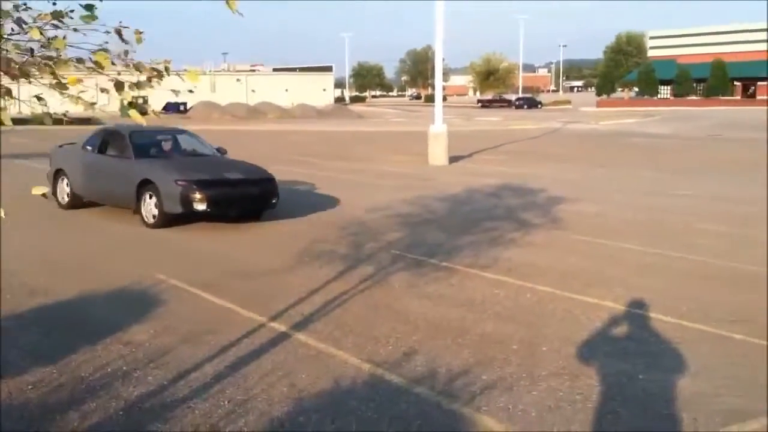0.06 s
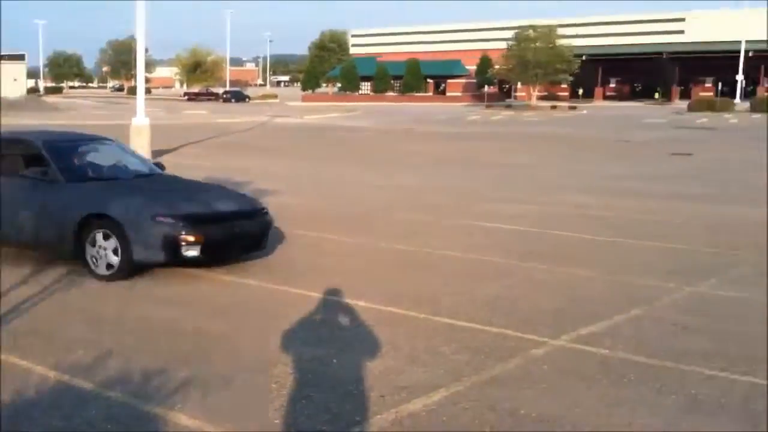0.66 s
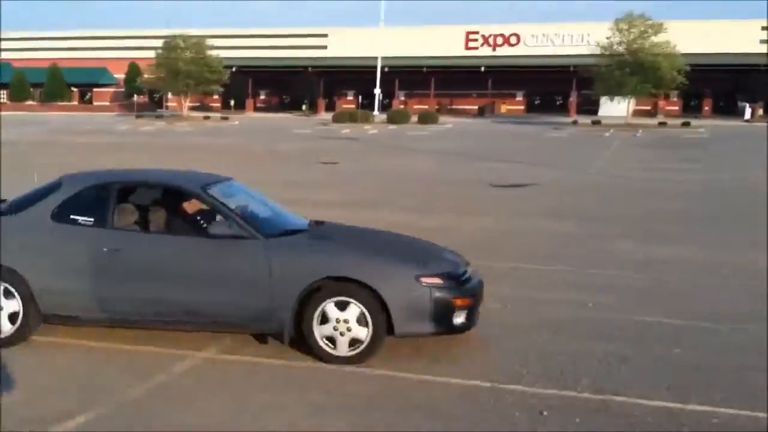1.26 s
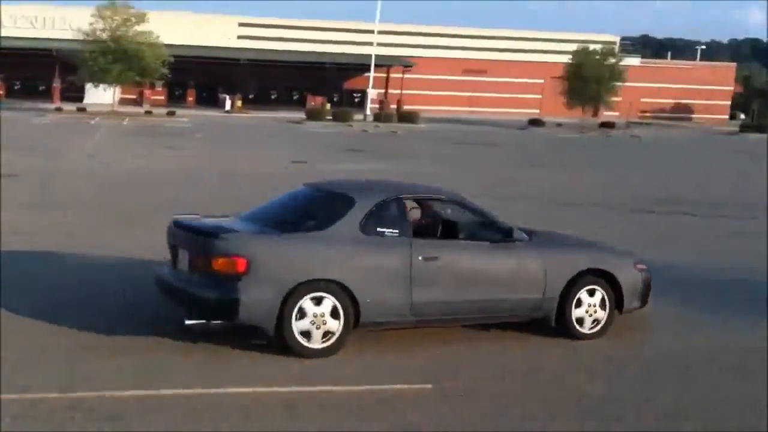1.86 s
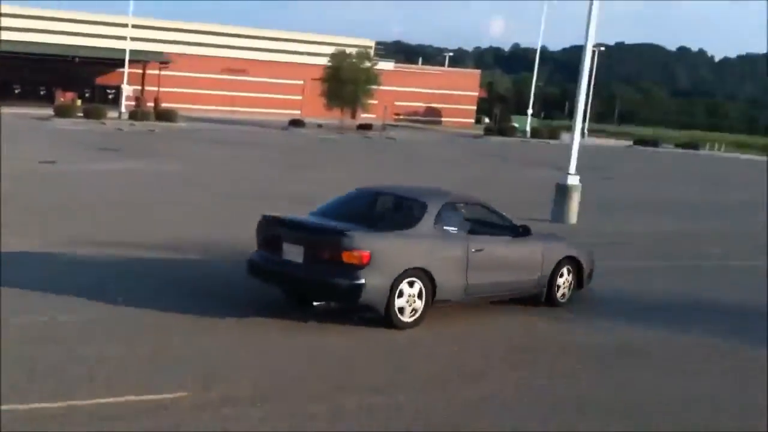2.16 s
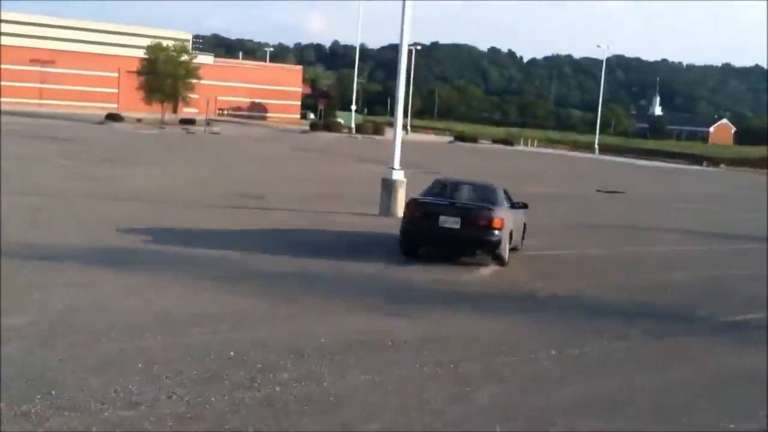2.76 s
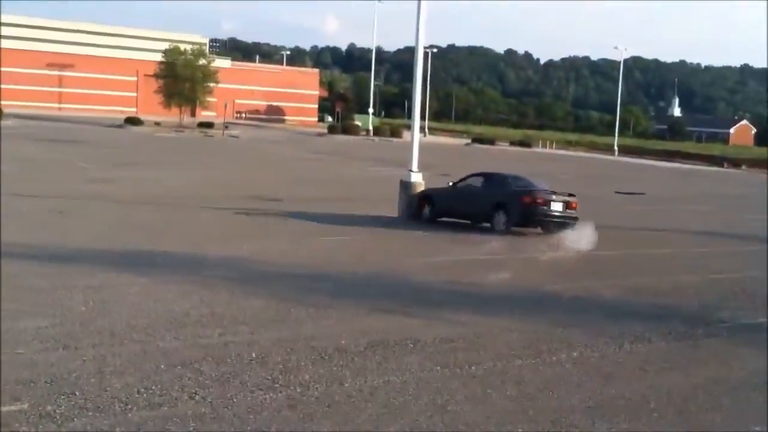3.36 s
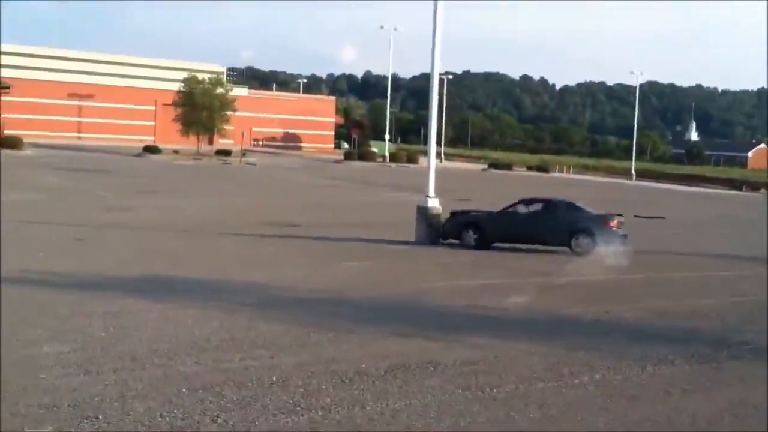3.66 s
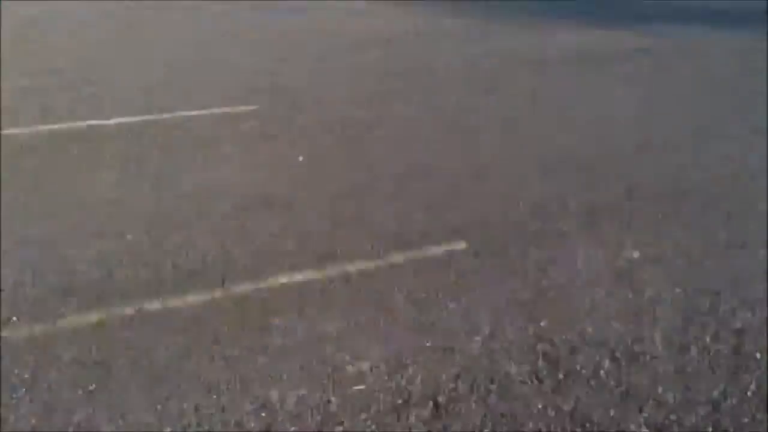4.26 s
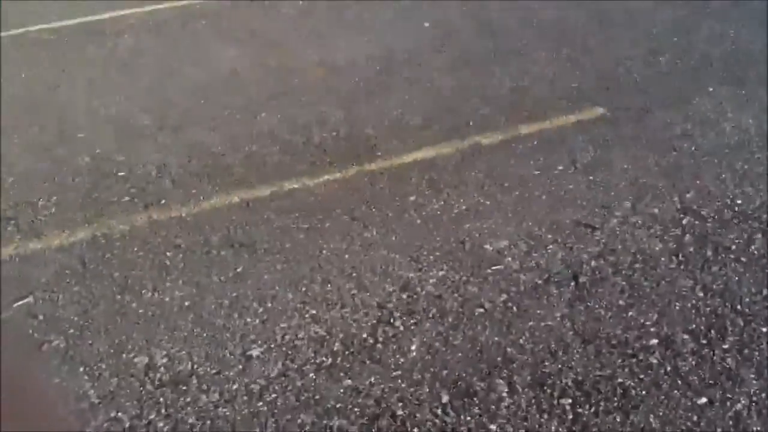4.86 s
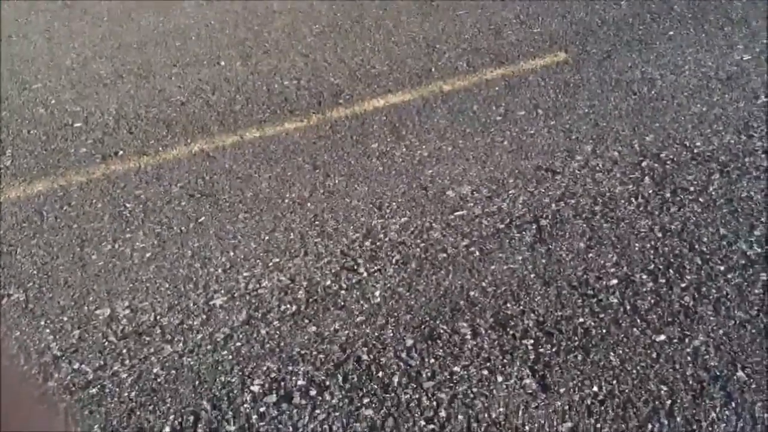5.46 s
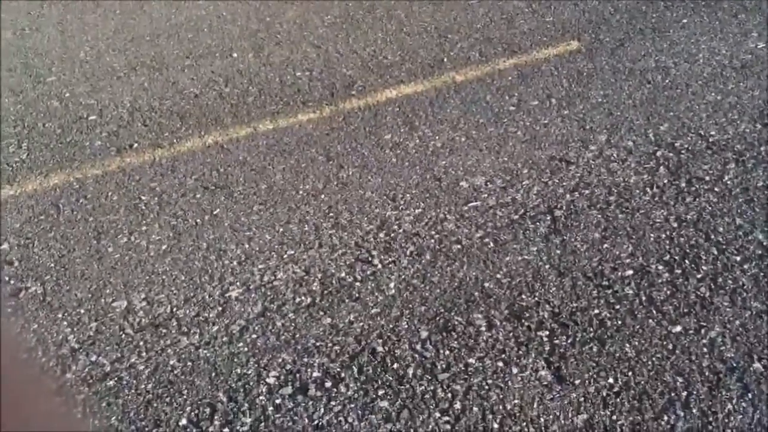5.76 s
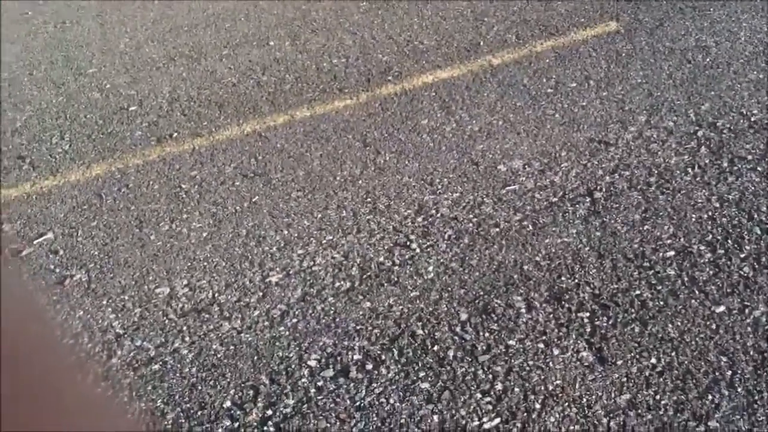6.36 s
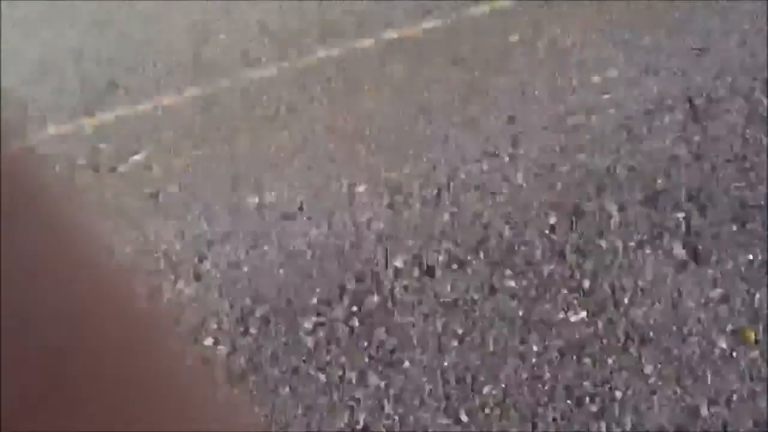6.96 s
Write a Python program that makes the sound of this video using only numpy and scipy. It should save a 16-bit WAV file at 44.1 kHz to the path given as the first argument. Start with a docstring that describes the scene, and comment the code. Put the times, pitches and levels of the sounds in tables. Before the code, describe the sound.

A car revs past outdoors, skids with squealing tyres and crashes with one short, loud crunching bang that echoes.

```python
"""A four-cylinder coupe revs past in an open car park, lifts off and skids into a concrete lamp base.
Its firings pulse through the exhaust, stones pop under the tyres, and locked rubber scrubs and squeals
over gritty asphalt. The engine stops and the front crumples in one short bang of buckling panels.
Far buildings throw the skid and the bang back; wind bumps the microphone, and a thin high hiss
hangs over the outdoor hum."""
import sys
import numpy as np
from scipy import signal
from scipy.fft import rfft, irfft
from scipy.io import wavfile
from scipy.ndimage import uniform_filter1d, minimum_filter1d

SR = 44100
rng = np.random.default_rng(int(sys.argv[2]) if len(sys.argv) > 2 else 0)


def bounce(signal):
    """Save signal as a 16-bit WAV file at the path given by the first command-line argument."""
    frames = np.transpose(np.atleast_2d(signal))
    limited = np.clip(frames, -1, 1)
    pcm = np.round(limited * 32767).astype(np.int16)
    wavfile.write(sys.argv[1], SR, pcm)


N = 310023
TIME = np.arange(N) / SR

# tone of the outdoor hum, open and shaded by a finger, and of the high hiss: f/Hz, level/dB
HUM_EQ = [(100,-17),(240,-2),(380,-7.5),(490,3),(630,-6.5),(890,-4.5),(1100,-9.5),(1400,-1),(1600,-3.5),(1880,-3.5),(2100,-13),(2450,-5.5),(2950,-7.5),(3250,-11.5),(3600,-12.5),(4100,-15),(6500,-36)]
SHADED_HUM_EQ = [(100,-17),(240,-10),(520,2.5),(1200,-8),(1500,2),(2050,-7),(2480,-12),(2680,-9),(3000,-6),(3600,-18.5),(4700,-16),(6500,-43)]
HISS_EQ = [(2500,-25),(4000,-19),(5400,-4.5),(5950,-1),(6600,-5),(7900,-2),(10500,-8),(12500,-11),(15000,-28)]
# fader rides for hum, hiss and breeze: t/s, level/dB
HUM_RIDE = [(4.4, -50), (5.25, -51.5), (5.6, -46.5), (6.2, -50.5), (6.7, -47.5), (7.03, -49.5)]
HISS_RIDE = [(3.8,-64.5),(4.73,-65),(4.8,-58),(5.24,-58),(5.36,-53.5),(6.0,-53.5),(6.2,-58.5),(7.03,-55.5)]
BREEZE_RIDE = [(3.7, -52), (4.0, -41.5), (4.3, -37), (4.55, -44), (5.1, -48.5), (6.1, -53), (7.03, -51.5)]
# whistly tints in the hiss: t/s, level/dB, f/Hz, half-length/s, width/Hz
WHISTLES = [(5.25,-67,5820,0.43,350),(5.55,-57.5,7700,0.2,1300),(6.52,-58.5,1540,0.21,45),(6.85,-63,11200,0.31,1600)]
# wind bumps on the microphone: t/s, level/dB, swell/s
WIND_BUMPS = [(0.469,-16,0.0054),(0.603,-20.5,0.0087),(0.679,-22.5,0.0077),(1.11,-21,0.015),(1.381,-16.5,0.0068),(2.309,-21,0.027),(2.438,-20,0.0071),(4.107,-31,0.0097),(4.204,-31,0.017),(4.35,-36.5,0.021),(4.705,-35.5,0.0093),(4.858,-32.5,0.0058),(5.167,-42.5,0.0088),(5.311,-37.5,0.005),(5.654,-43,0.0099)]
# tone of the wind and of the far echoes: f/Hz, level/dB
WIND_EQ = [(30,-39),(60,-25),(95,-5.5),(150,5),(290,-2),(460,-11),(600,-22.5),(900,-53)]
ECHO_EQ = [(260, -27), (450, -4), (910, 1.5), (1160, 3.5), (1370, -17), (1620, -8.5), (2410, -6),
           (5500, -27), (7800, -75)]
# returns from far buildings: delay/s, level/dB, smear/s
FAR_WALLS = [(0.25, -40, 0.025), (0.48, -30, 0.05), (0.66, -33, 0.05)]

# short bursts of band noise (grit, rattles, dull returns of the bang): t/s, level/dB, f/Hz, half-length/s
BURSTS = [(0.869,-42,3800,0.048),(1.702,-26.5,1230,0.005),(3.297,-50,8500,0.03),(2.386,-46.5,8940,0.0058),(3.716,-48,6400,0.009),(3.898,-40,770,0.029),(4.101,-44,2850,0.026),(4.441,-38,460,0.0078),(4.285,-38,1050,0.017),(5.544,-43,700,0.0087)]
# stones pinched under the tyres: t/s, pop/dB, chip/dB, ring/dB
STONES = [(0.424,-15,-15,-12),(0.5044,-30,-18.5,-36),(0.995,-17,-18,-28),(1.207,-2.5,-13,-22),(1.698,-16,-35,-21),(2.503,-17,-45,-13.5)]
# tone of a stone's hollow pop and bright chip: f/Hz, level/dB
POP_EQ = [(150,-49),(520,0.5),(750,2),(1050,5),(1300,-19),(1600,-7.5),(1900,-13),(2350,-5),(5000,-38),(15000,-40)]
CHIP_EQ = [(500,-13),(1400,-8),(2400,13),(4300,7),(5200,-3.5),(9000,-12),(15000,-30)]
# a stone's woody ring: f/Hz, level/dB, t60/s
KNOCK_MODES = [(850, -2, 0.036), (980, -15.5, 0.037)]

# engine speed as firing rate: t/s, f/Hz
FIRING_RATE = [(0.0, 96.4), (0.27, 114.6), (0.43, 117), (0.85, 102), (0.95, 87), (1.07, 70.6), (1.16, 80),
               (2.18, 99.4), (2.3, 111), (2.46, 99), (2.72, 90), (3.11, 72), (3.25, 48), (3.4, 57.5)]
# open throttle: start/s, end/s
THROTTLE_OPEN = [(-0.1, 0.3), (0.92, 2.22)]
# the tailpipe as the car turns, passes and leaves: t/s, level/dB, overtone lift/dB
TAILPIPE_RIDE = [(0,-24.5,-2),(0.1,-22.5,-2),(0.33,-22,-6),(0.55,-21.5,6),(0.82,-28,-0.5),(1.05,-25.5,0),(1.15,-25,4),(1.28,-25.5,-9.5),(1.36,-24,-6),(1.55,-20,-8),(1.63,-23.5,3),(1.69,-31.5,7.5),(1.82,-20,2.5),(1.95,-21.5,-5.5),(2.12,-21,1),(2.22,-23,0),(2.6,-25.5,4.5),(3.0,-38,2),(3.4,-23,3.5)]
# standing waves of pipe and silencer, and the tone of a puff of gas: f/Hz, level/dB
EXHAUST_EQ = [(58,-35),(78,-11.5),(96,-13.5),(120,-10.5),(148,-10),(172,0.5),(200,-0.5),(238,-2.5),(256,-10.5),(278,-5),(315,-4),(350,-9.5),(398,-7),(430,-10.5),(510,-20),(580,-11.5),(1100,-26.5)]
CHUFF_EQ = [(150,-9),(260,1.5),(420,-1.5),(520,-14),(700,-6.5),(1100,-12),(2000,-26)]
# fader rides for the pass-by: t/s, roar/dB, whirr/dB, rumble/dB
PASS_RIDE = [(0, -37.5, -36.5, -29), (0.8, -37, -37.5, -34.5), (1.1, -30.5, -36.5, -29),
             (1.35, -33, -41, -29.5), (2.05, -28, -48, -31.5), (2.56, -32, -42, -36.5)]
# tone of tyre and exhaust roar, engine-bay whirr and road rumble: f/Hz, level/dB
ROAR_EQ = [(280, -9.5), (500, -6), (600, 0), (905, 3.5), (1210, -6), (1370, -16), (2440, -6.5), (2950, -14),
           (4280, -29), (5880, -30.5), (8680, -28.5), (15000, -52.5)]
WHIRR_EQ = [(760, -28), (1300, -20), (1540, -3.5), (2010, -10), (2360, -2), (2630, -11), (3920, -9),
            (5720, -22.5), (14000, -51)]
ROAD_EQ = [(30,-22),(60,-18),(100,-20.5),(150,5),(290,-1.5),(460,-12.5),(600,-24),(900,-53)]
# a breathy whine that climbs as the engine pulls: t/s, f/Hz, level/dB
WHINE_GLIDE = [(1.65,2650,-56),(1.8,2900,-42.5),(2.0,3372,-49),(2.16,3900,-46.5),(2.24,4010,-65)]

# tyre squeals, thin in the turn and lower in the slide: t/s, level/dB, f/Hz, half-length/s
SQUEALS = [(1.55,-40,2637,.1),(1.68,-36,2607,0.025),(2.63,-19.5,1015,0.0078),(2.727,-18.5,1055,.008),(2.867,-26,2450,.022),(2.885,-16.5,671,0.012),
           (2.905,-18,1003,.03),(3.14,-19.5,1130,0.019),(3.22,-17,900,0.027)]
# the tyres bite harder: t/s, level/dB, hold/s, decay/s, grit against the bite/dB
TYRE_GRABS = [(2.564,-30,.006,0.0054,1),(2.61,-26,.003,0.008,2.5),(2.622,-18.5,0.0098,0.0081,-6),(2.654,-23,0.02,0.017,-9),(2.697,-20.5,.002,0.005,5.5),(2.721,-20,0.0042,0.012,-5.5),(2.855,-15.5,0.039,0.067,-9),(2.95,-21,.1,0.028,-8.5),(3.123,-19,0.024,0.068,-11),(3.195,-21,0.06,0.0073,-22)]
# tread resonances in the slide: f/Hz, width/Hz, relative level/dB
TREAD_MODES = [(1028,60,-11.5),(1630,65,-21),(2510,55,-20),(3388,56.6,-20.5)]
# tone of scrubbing rubber and thrown grit: f/Hz, level/dB
SCRUB_EQ = [(120,-15.5),(230,-4),(430,-5),(520,-16.5),(600,-5.5),(720,-1),(1000,1),(1160,-0.5),(1290,-15),(1480,-3),(1850,-5.5),(2100,-14),(2520,-5),(3400,-18.5),(3700,-25),(4600,-23.5),(5400,-31.5),(8400,-26),(11500,-40.5),(15000,-56)]
GRIT_EQ = [(1400,-11),(2000,-4),(2420,7.5),(3000,-3),(3450,-14),(3750,-2),(4150,-11),(4550,-4.5),(5700,-29),(6400,-19),(7200,-30),(8500,-22.5),(15000,-45)]

# the largest buckles of the crash: t/s, crack/dB, thud/dB
BUCKLES = [(3.614,-26,-6.5),(3.6237,-20,-7),(3.629,-22,-10),(3.6334,-13,-7),(3.644,-23,-7),(3.6527,-10,-13),(3.6593,-21,-6),(3.662,-27,-5),(3.6668,-5.5,-7.5),(3.677,-24,-30)]
# ringing front panels: f/Hz, level/dB, t60/s
PANEL_MODES = [(191,-14.5,0.079),(305,-14.5,0.046),(805,-11,0.025),(2460,14,0.0075),(2620,-18.5,0.037),(4580,-7.5,0.0094),(7650,-19,.008)]
# tone of the body's boom and the crumple's crunch: f/Hz, level/dB
BOOM_EQ = [(40,-61.5),(85,-18),(180,1),(340,1.5),(440,-9),(513,-36),(600,-17)]
CRUNCH_EQ = [(290, -30), (480, -21), (620, 4), (815, 3), (1180, -5.5), (1270, -18), (1670, -4),
             (2070, -16.5), (2610, -0.5), (3530, -17), (4570, -13), (5130, -28), (8850, -18.5),
             (15500, -46)]
# hollows in the microphone's response: f/Hz, width/Hz, depth/fraction
MIC_HOLLOWS = [(525,310,0.32),(1260,21,0.3),(2115,40,0.2),(5370,270,0.12)]


def from_db(db):
    """Decibels to gain."""
    return 10 ** (np.asarray(db) / 20)


def unit_rms(x):
    """Scale to unit rms."""
    return x / np.sqrt(np.mean(x ** 2) + 1e-20)


def automation(rows):
    """One curve per column, drawn through a table's time points."""
    times, *columns = np.transpose(rows)
    return [np.interp(TIME, times, column) for column in columns]


def held(start, end, attack, release):
    """Envelope at one from start to end, with exponential attack and release."""
    return np.exp(-np.maximum(start - TIME, 0) / attack - np.maximum(TIME - end, 0) / release)


def during(rows, fade_s):
    """A soft gate, open while a table lasts."""
    return held(rows[0][0], rows[-1][0], fade_s, fade_s)


def swell(centre_s, half_length_s):
    """A bell-shaped envelope."""
    return np.exp(-.5 * ((TIME - centre_s) / half_length_s) ** 2)


def drift(rate_hz):
    """Smooth random modulation of unit rms."""
    step, run_in = 40, 2000
    pole = np.exp(-2 * step * np.pi * rate_hz / SR)
    white = rng.standard_normal(N // step + run_in + 2)
    slow = signal.lfilter([1], [1, -2 * pole, pole * pole], white)[run_in:]
    return np.interp(np.arange(N) / step, np.arange(len(slow)), unit_rms(slow))


def butter(x, order, hz, kind):
    """A Butterworth low-, high- or band-pass."""
    return signal.sosfilt(signal.butter(order, hz, kind, fs=SR, output="sos"), x + 1e-18)


def response(eq, size=4096):
    """Minimum-phase impulse of an EQ curve, falling 24 dB an octave past its ends; unit energy."""
    hz, db = np.transpose(eq)
    octave, points = np.log2(np.maximum(np.fft.rfftfreq(size, 1 / SR), 10)), np.log2(hz)
    octaves_outside = np.abs(octave - np.clip(octave, points[0], points[-1]))
    cepstrum = irfft(np.log(from_db(np.interp(octave, points, db) - 24 * octaves_outside)))
    cepstrum[1:size // 2] *= 2
    cepstrum[size // 2 + 1:] = 0
    impulse = irfft(np.exp(rfft(cepstrum)))
    return impulse / np.linalg.norm(impulse)


def colour(x, eq):
    """Play a sound through an EQ curve."""
    return signal.oaconvolve(x, response(eq))[:N]


def clicks(times, db):
    """Single-sample blows."""
    out = np.zeros(N)
    out[(np.asarray(times) * SR).astype(int)] = from_db(db)
    return out


def strike(times, db, eq):
    """Hits of given peak level on a body with this tone."""
    return colour(clicks(times, db), eq) / np.abs(response(eq)).max()


def grains(per_s, spread_db):
    """A crackle of tiny clicks of unequal size; unit rms."""
    sizes = from_db(spread_db * np.minimum(rng.exponential(1, N), 4)) * rng.choice([-1, 1], N)
    return unit_rms(sizes * (rng.random(N) < per_s / SR))


def turbulence(eq, flutter_db, rate_hz):
    """Coloured noise whose level flutters."""
    return colour(rng.standard_normal(N), eq) * unit_rms(from_db(flutter_db * drift(rate_hz)))


def resonate(x, hz, width_hz):
    """One resonance with unity gain at its peak."""
    pole = np.exp(-np.pi * width_hz / SR)
    feedback = [1, -2 * pole * np.cos(2 * np.pi * hz / SR), pole * pole]
    return signal.lfilter(np.array([1, 0, -1]) * (1 - pole * pole) / 2, feedback, x + 1e-18)


def ring(blows, hz, t60):
    """Each blow rings a dying sine; little is radiated below the mode."""
    pole, angle = from_db(-60 / (t60 * SR)), 2 * np.pi * hz / SR
    motion = signal.lfilter([0, np.sin(angle)], [1, -2 * pole * np.cos(angle), pole * pole], blows + 1e-18)
    return butter(motion, 2, hz / 2, "high")


def swept_band(x, hz, width_hz):
    """A resonance whose centre follows a pitch curve; unit rms."""
    carrier = np.exp(2j * np.pi * np.cumsum(hz) / SR)
    return unit_rms(np.real(carrier * butter(x / carrier, 2, width_hz / 2, "low")))


def whistling(rows, wander, rate_hz, evenness):
    """Narrow bands swell and fade at a wandering pitch; evenness 0 is airy, 1 a rough tone."""
    out, bend = np.zeros(N), 1 + wander * drift(rate_hz)
    white = rng.standard_normal(N) + 1j * rng.standard_normal(N)
    for t, db, hz, half_length, width_hz in rows:
        near = np.flatnonzero(np.abs(TIME - t) < 3.5 * half_length)
        flutter = butter(white[:len(near)], 2, width_hz / 2, "low")
        flutter /= np.abs(flutter) ** evenness
        tone = np.real(flutter * np.exp(2j * np.pi * np.cumsum(hz * bend[near]) / SR))
        out[near] += from_db(db) * unit_rms(tone) * swell(t, half_length)[near]
    return out


def phasing(x, depth, rate_hz, count=7):
    """Near reflections come and go as things move, combing a noise at constant power."""
    out, power = x.copy(), np.ones(N)
    for lag in (np.geomspace(.0007, .007, count) * SR).astype(int):
        strength = depth / np.sqrt(count) * drift(rate_hz)
        out[lag:] += strength[lag:] * x[:-lag]
        power += strength ** 2
    return out / np.sqrt(power)


def outdoor_hum(shaded_s=6.05, crossfade_s=0.3):
    """A hollow bed of hum that changes colour as a finger slides over the microphone."""
    shade = np.clip((TIME - shaded_s) / crossfade_s + .5, 0, 1)
    open_hum = np.sqrt(1 - shade) * turbulence(HUM_EQ, flutter_db=1.5, rate_hz=19)
    shaded_hum = np.sqrt(shade) * turbulence(SHADED_HUM_EQ, flutter_db=0.7, rate_hz=18)
    return from_db(automation(HUM_RIDE)[0]) * phasing(open_hum + shaded_hum, depth=.3, rate_hz=1.2)


def high_hiss():
    """Thin, phasey air, combed by a gliding near reflection and tinted with faint whistles."""
    hiss = phasing(colour(rng.standard_normal(N), HISS_EQ), depth=.6, rate_hz=1.2)
    delay_s = 0.00081 * (1 + 0.05 * drift(1))
    combed = hiss + 0.26 * np.interp(TIME - delay_s, TIME, hiss)
    tints = whistling(WHISTLES, wander=0.018, rate_hz=1.3, evenness=0)
    return from_db(automation(HISS_RIDE)[0]) * unit_rms(combed) + tints


def wind():
    """Lumpy low rumble that calms down, with single eddies bumping the microphone."""
    eddies = np.zeros(N)
    for t, db, swell_s in WIND_BUMPS:
        age = np.maximum(TIME - t, 0) / swell_s
        eddies += from_db(db) * age * np.exp(1 - np.minimum(age, 20))
    air = turbulence(WIND_EQ, flutter_db=1.0, rate_hz=12)
    even_air = air / np.sqrt(uniform_filter1d(air ** 2, size=600) + 1e-6)
    breeze = turbulence(WIND_EQ, flutter_db=np.interp(TIME, [4.4, 5.9], [2.5, .6]), rate_hz=19)
    return from_db(automation(BREEZE_RIDE)[0]) * breeze + eddies * even_air


def far_echoes(x, tail_db=-31, t60=5):
    """Far walls scatter a sound back as a dull wash: one swell per wall, over a dying tail."""
    tail = from_db(-60 * TIME / t60) ** 2
    returns = from_db(tail_db) ** 2 * tail / tail.sum()
    for delay, db, smear in FAR_WALLS:
        bloom = swell(delay, smear)
        returns += from_db(db) ** 2 * bloom / bloom.sum()
    power = np.maximum(signal.fftconvolve(x ** 2, returns)[:N], 0)
    return np.sqrt(power) * colour(rng.standard_normal(N), ECHO_EQ)


def slapback(x, delay_s=0.635, send_db=-23.5, centre_hz=1200):
    """A flat shop front gives one clear, hollow slap, all midrange."""
    delayed = np.interp(TIME - delay_s, TIME, x)
    return from_db(send_db) * butter(delayed, 2, [centre_hz / 1.32, centre_hz * 1.35], "band")


def noise_bursts():
    """Short bursts of band noise: grit, rattles and dull returns of the bang."""
    out = np.zeros(N)
    for t, db, hz, half_length in BURSTS:
        band = butter(grains(8000, spread_db=1.5), 3, [hz / 1.4, hz * 1.4], "band")
        out += from_db(db) * unit_rms(band) * swell(t, half_length)
    return out


def stones(rattle_samples=2048):
    """Each pinched stone gives a hollow pop, a woody knock and a bright, rattling chip."""
    times, pop_db, chip_db, ring_db = np.transpose(STONES)
    rattle = 0.11 * rng.standard_normal(rattle_samples) * np.exp(-TIME[:rattle_samples] / 0.0033)
    rattle[0] = 1   # the clean hit ahead of its rattle
    chip = signal.oaconvolve(strike(times, chip_db, CHIP_EQ), rattle)[:N]
    thump = ring(clicks(times, 2 * pop_db + 0.5), hz=284, t60=0.032)   # big stones thump the tyre
    knock = sum(ring(clicks(times, ring_db + db), hz, t60) for hz, db, t60 in KNOCK_MODES)
    return strike(times, pop_db, POP_EQ) + knock + thump + chip


def exhaust(harmonics=9, pedal_s=0.018):
    """Firings ring the pipe, full on throttle, thin and ragged off it; gives note and firing phase."""
    firing_hz, = automation(FIRING_RATE)
    tailpipe_db, overtone_db = automation(TAILPIPE_RIDE)
    throttle = np.max([held(start, end, pedal_s, pedal_s) for start, end in THROTTLE_OPEN], axis=0)
    load = from_db(-11.5 * (1 - throttle))   # coasting drops the overtones,
    bass_load = from_db(-2 * (1.5 - throttle))   # the fundamental hardly
    roughness = 0.28 - 0.1 * throttle
    phase = 2 * np.pi * np.cumsum(firing_hz * (1 + 0.0281 * roughness * drift(26))) / SR
    pipe_hz, pipe_db = np.transpose(EXHAUST_EQ)
    pipe_phase = np.unwrap(np.angle(rfft(response(EXHAUST_EQ))))   # the pipe rings on after each firing
    bin_hz = np.linspace(0, SR / 2, len(pipe_phase))
    note = np.zeros(N)
    for k in range(1, harmonics + 1):
        angle = k * phase + np.interp(k * firing_hz, bin_hz, pipe_phase)
        tilt_db = overtone_db * (k > 2) - 7 * (k > 4)
        gain = from_db(np.interp(k * firing_hz, pipe_hz, pipe_db) + tilt_db + 1.16 * drift(6.7))
        gain *= bass_load if k == 1 else load
        waver = roughness * np.sqrt(k / 2)   # high harmonics waver most
        partial = np.cos(angle) * (1 + waver * drift(15.6))
        jitter = 0.3 * waver * np.sin(angle) * drift(26)
        note += gain * (partial + jitter)
    for half_order in (2.5, 3.5, 4.5):   # unequal cylinders growl between the harmonics
        note += from_db(-27.5) * load * np.cos(half_order * phase) * drift(26)
    gas = unit_rms(np.exp(2.1 * np.cos(phase))) * rng.standard_normal(N)   # one puff per firing
    note += from_db(overtone_db - 18) * load * colour(gas, CHUFF_EQ)
    uneven_db = 0.6 * drift(70)   # no two firings are equally strong
    note *= np.sqrt(2) * from_db(tailpipe_db + uneven_db) * during(FIRING_RATE, fade_s=0.018)
    return butter(note, 6, 62, "high"), phase   # steep low cut keeps the engine note free of sub-bass


def pass_by():
    """Exhaust note, a roar pulsing with the firings, under-bonnet whirr and whine, and road rumble."""
    note, firing_phase = exhaust()
    roar_db, whirr_db, rumble_db = automation(PASS_RIDE)
    pulse = unit_rms(1 + 0.25 * np.cos(firing_phase))
    roar = from_db(roar_db) * turbulence(ROAR_EQ, flutter_db=1.5, rate_hz=11) * pulse
    chatter = 0.41 * rng.standard_normal(N) + 0.38 * grains(1500, spread_db=0.99)
    whirr = from_db(whirr_db) * colour(chatter, WHIRR_EQ)
    rumble = from_db(rumble_db) * turbulence(ROAD_EQ, flutter_db=2.0, rate_hz=13)
    rumble *= during(PASS_RIDE, fade_s=0.49)
    whine_hz, whine_db = automation(WHINE_GLIDE)
    whine = from_db(whine_db) * swept_band(rng.standard_normal(N), whine_hz, width_hz=400)
    whine *= during(WHINE_GLIDE, fade_s=0.02)
    rush = phasing(roar + whirr, depth=0.53, rate_hz=4.1) * during(PASS_RIDE, fade_s=0.021)
    return note + rumble + whine + rush


def squeal(width_hz=96):
    """Tread blocks stick and slip at an unsteady pitch, in hoarse overlapping chirps."""
    return whistling([(*row, width_hz) for row in SQUEALS], wander=0.01175, rate_hz=12.5, evenness=0.56)


def skid(lock_s=2.565, build_s=0.43, slowing_s=2.616, stop_s=3.615):
    """Locked rubber tears over loose grit in quick uneven grabs, ringing the tread."""
    slide = from_db(np.interp(TIME, [lock_s, lock_s + build_s], [-28.5, -22.5]))
    slide *= held(lock_s, stop_s, attack=0.0025, release=0.0056)
    bites = np.array([from_db(db) * held(t, t + hold, 0.33 * decay, decay)
                      for t, db, hold, decay, _ in TYRE_GRABS])
    rubber_level = np.sqrt(slide ** 2 + np.sum(bites ** 2, axis=0))
    # grit is swept out as the wheels lock, and thrown by each bite
    swept = from_db(-30.5) * held(lock_s, lock_s + 0.172, attack=0.001, release=0.0083)
    grit_per_bite = from_db(np.array(TYRE_GRABS)[:, -1])
    grit_level = np.sqrt(swept ** 2 + grit_per_bite ** 2 @ bites ** 2)
    judder = unit_rms(from_db(1.9 * drift(90)))
    slips = grains(3000, spread_db=2.0) * judder
    bend = 1 + 0.024 * drift(7.3)   # the tread's pitch wavers with the grip
    tread = sum(from_db(db) * swept_band(slips, hz * bend, width) for hz, width, db in TREAD_MODES)
    friction = 0.72 * rng.standard_normal(N) + 0.88 * grains(3000, spread_db=2.6)
    scrub = colour(friction * judder, SCRUB_EQ)
    spray = grit_level * colour(grains(5000, spread_db=2.6) * judder, GRIT_EQ)
    rubber = phasing(scrub, depth=0.38, rate_hz=1.6) + tread
    slowed = np.clip((TIME - slowing_s) / (stop_s - slowing_s), 0, 1)
    lost_edge = 0.4 * np.sqrt(slowed) * butter(rubber, 1, 6900, "high")   # duller as the car slows
    return rubber_level * (rubber - lost_edge) + spray


def crash(hit_s=3.618, crumple_s=0.044, attack_s=0.0055, sag_db_per_s=-49):
    """Bumper and bonnet fold in a burst of buckles; the largest thud the body and ring the panels."""
    crumple = held(hit_s, hit_s + crumple_s, attack_s, release=0.006)
    shiver = from_db(-18.5) * held(hit_s, hit_s + crumple_s, attack_s, release=0.045)
    force = (crumple + shiver) * from_db(sag_db_per_s * np.clip(TIME - hit_s, 0, crumple_s))
    boom = colour(from_db(-16.5) * force * grains(5000, spread_db=1.2), BOOM_EQ)
    crunch = colour(from_db(-11.5) * force * grains(4500, spread_db=3), CRUNCH_EQ)
    times, crack_db, thud_db = np.transpose(BUCKLES)
    panels = sum(ring(clicks(times, crack_db + db + rng.normal(0, 3.0, len(times))), hz, t60)
                 for hz, db, t60 in PANEL_MODES)
    return boom + crunch + strike(times, thud_db, BOOM_EQ) + panels


def scene():
    """The mono mix at one hand-held microphone; only skid and crash feed the echoes."""
    accident = skid() + crash()
    car = pass_by() + squeal() + stones() + accident
    echoes = slapback(accident) + far_echoes(accident)
    return (car + echoes + noise_bursts() + wind() + outdoor_hum() + high_hiss())[None]


def record(dry):
    """The microphone's hollows and bass roll-off, a fast limiter on the highest peaks, and a top cut."""
    for hz, width_hz, depth in MIC_HOLLOWS:
        dry = dry - depth * resonate(dry, hz, width_hz)
    dry = butter(dry, 2, 38, "high")
    peak_gain = 1 / np.maximum(np.abs(dry), 1)
    limiter_gain = uniform_filter1d(minimum_filter1d(peak_gain, size=65), size=65)
    top_cut = signal.cheby2(14, 70, 15950, fs=SR, output="sos")
    return signal.sosfilt(top_cut, dry * limiter_gain)


dry = scene()
out = record(dry)
bounce(out)
```